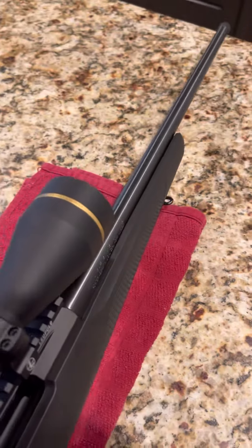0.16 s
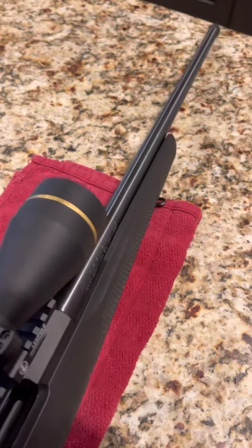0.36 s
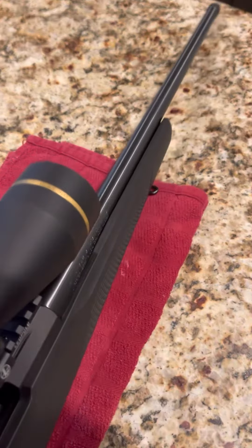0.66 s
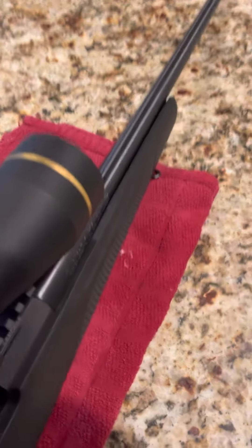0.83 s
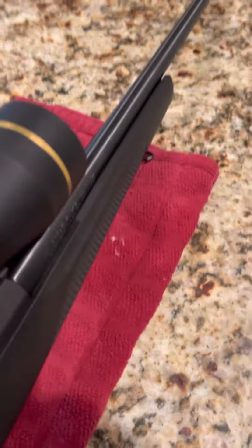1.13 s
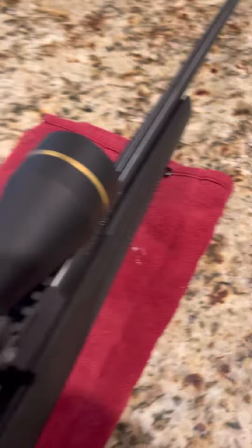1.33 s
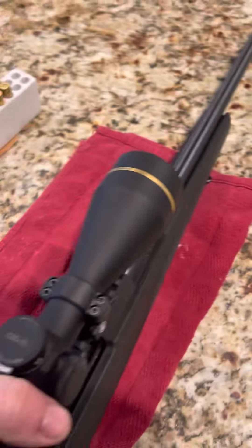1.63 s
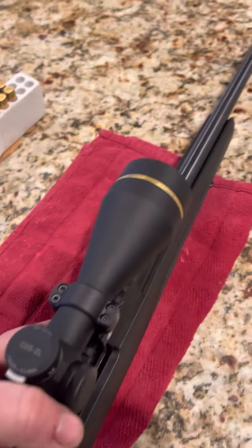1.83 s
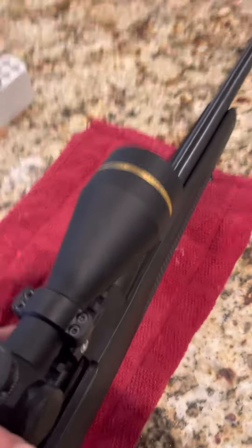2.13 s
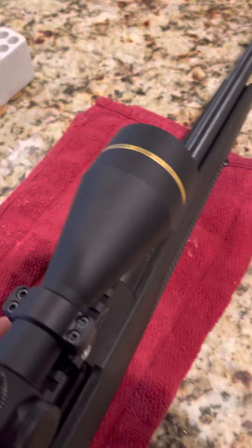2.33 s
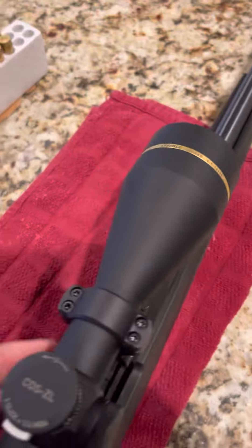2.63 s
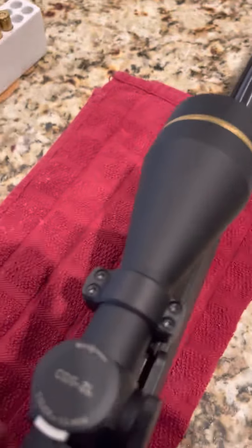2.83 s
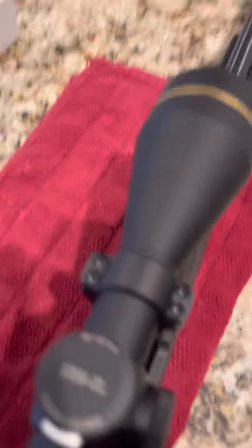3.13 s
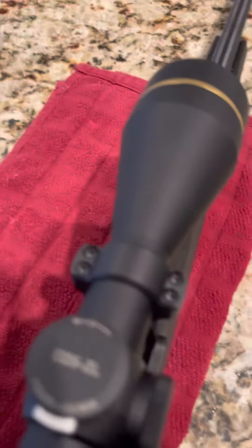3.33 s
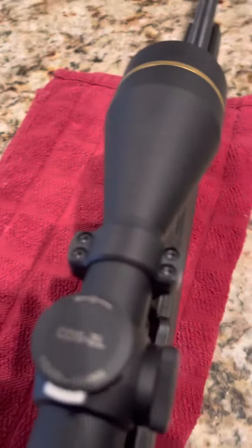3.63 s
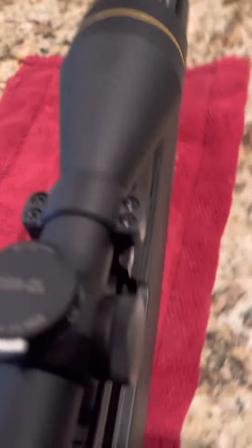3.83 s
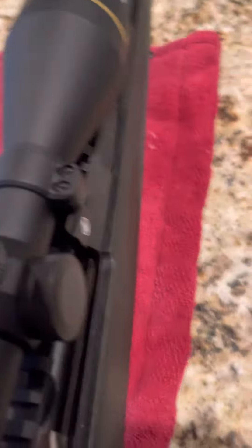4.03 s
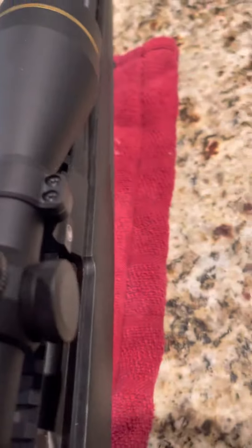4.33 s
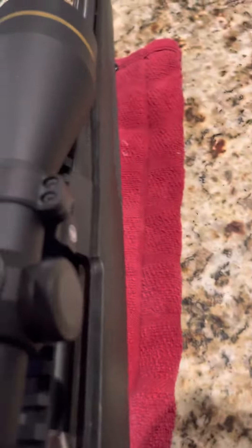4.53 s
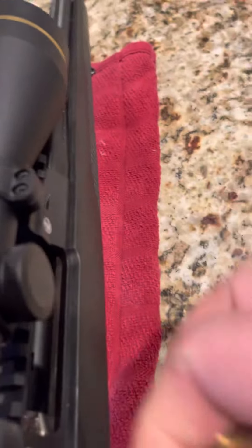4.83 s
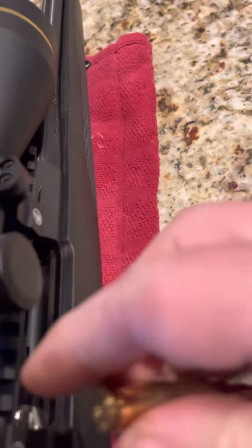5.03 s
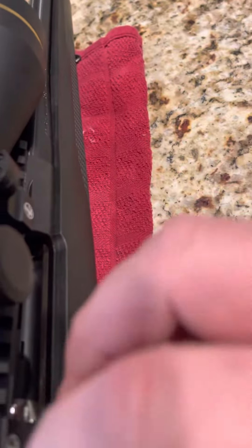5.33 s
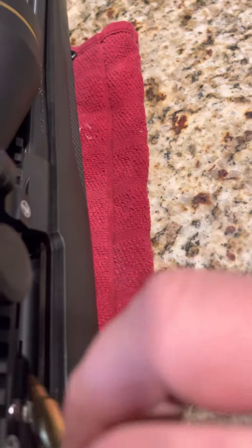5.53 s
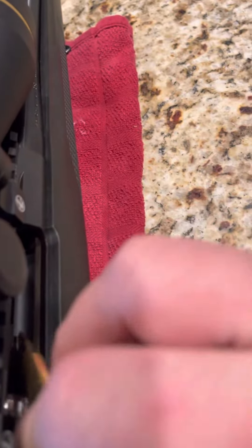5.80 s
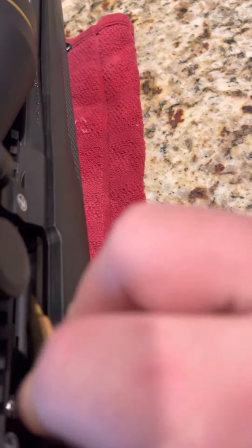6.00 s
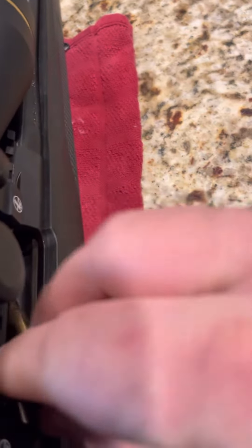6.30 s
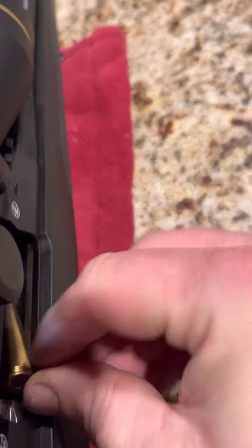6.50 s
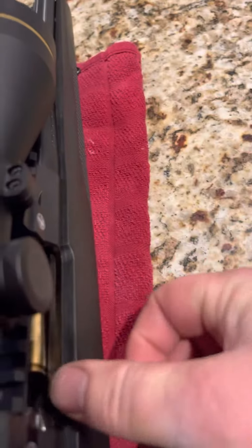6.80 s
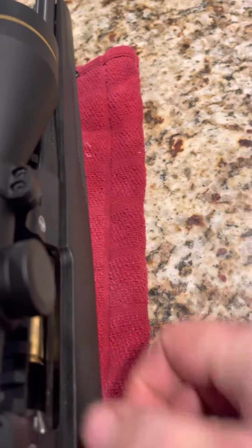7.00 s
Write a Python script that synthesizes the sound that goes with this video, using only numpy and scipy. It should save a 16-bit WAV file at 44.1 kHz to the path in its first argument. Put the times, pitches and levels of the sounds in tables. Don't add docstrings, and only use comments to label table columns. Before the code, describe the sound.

Close phone pickup in a small hard kitchen, fridge humming faintly. First a dull woody knock with quick fading bounces, then several seconds of faint cloth rustle and a couple of light taps as the rifle settles. Near the end, crisp brass-on-steel ticks grow denser, a gritty slide follows, and the round clacks home with short metallic rattles before dying to near silence.

```python
import sys
import numpy as np
from scipy import signal
from scipy.fft import rfft, irfft, next_fast_len
from scipy.io import wavfile
from scipy.ndimage import uniform_filter1d

SR = 44100
rng = np.random.default_rng(int(sys.argv[2]) if len(sys.argv) > 2 else 0)


def pcm_store(signal):
    levels = np.round(np.clip(np.atleast_2d(signal), -1, 1) * 32767)
    wavfile.write(sys.argv[1], SR, levels.astype(np.int16).T)


def decibels_to_gain(level_db):
    exponent = np.asarray(level_db, float) / 20
    return 10 ** exponent


N = 315622


def rms_one(x):
    return x / np.sqrt(np.mean(x ** 2) + 1e-20)


def filtered(x, order, hz, kind="low"):
    return signal.sosfilt(signal.butter(order, hz, kind, fs=SR, output="sos"), x)


def at_hz(points, hz):
    points_hz, value = np.transpose(points)
    return np.interp(np.log(hz + 1), np.log(points_hz), value)


def drift(rate_hz):
    hop, settle = 40, 2000
    r = np.exp(-2 * np.pi * rate_hz * hop / SR)
    noise = rng.standard_normal(N // hop + settle + 2)
    slow = signal.lfilter([1], [1, -2 * r, r * r], noise)[settle:]
    return np.interp(np.arange(N) / hop, np.arange(len(slow)), rms_one(slow))


def coloured(spectrum):
    size = next_fast_len(N)
    hz = np.fft.rfftfreq(size, 1 / SR)
    gain = decibels_to_gain(at_hz(spectrum, hz)) * (hz > spectrum[0][0] / 2)
    white = rng.standard_normal((2, N))
    return rms_one(irfft(rfft(white, size) * gain, size)[:, :N])


def ring(force, hz, t60):
    r, w = decibels_to_gain(-60 / (t60 * SR)), 2 * np.pi * hz / SR
    return signal.lfilter([0, np.sin(w)], [1, -2 * r * np.cos(w), r * r], force)


def body(force, modes, extra_db):
    sound = sum(decibels_to_gain(db + extra) * ring(force, hz, t60) for (hz, db, t60), extra in zip(modes, extra_db))
    return filtered(sound, 3, [modes[0][0], 1.168 * modes[-1][0]], "band")


def favour(modes, favoured_hz):
    spread, boost_db = 0.1, 8
    mode_hz = np.array(modes)[:, 0]
    return boost_db * np.exp(-(np.log(mode_hz / favoured_hz) / spread) ** 2)


def strikes(events, parts, heavy_db, heavy_loss, contact_s, rise_s, trim_db, crack_db, after_db, after_s):
    out, span = np.zeros(N + SR), SR // 8
    age = np.arange(span) / SR
    for start_s, level_db, hard_db, pitch_hz in events:
        noise, at = rng.standard_normal(span), round(start_s * SR)
        part_db = heavy_db - heavy_loss * hard_db, 0, hard_db
        for modes, rel_db, length, rise, first_db in zip(parts, part_db, contact_s, rise_s, crack_db):
            hit = decibels_to_gain(-60 * np.clip(age - rise, 0, 1) / length)
            after = decibels_to_gain(after_db - 60 * age / after_s)
            chatter = noise * (hit + after) * np.clip(age / rise, 0, 1) + 1e-18
            chatter[0] = decibels_to_gain(first_db)
            scatter_db = rng.normal(0, 2.5, len(modes))
            sound = body(chatter, modes, scatter_db + favour(modes, pitch_hz))
            out[at:at + span] += decibels_to_gain(level_db + rel_db + trim_db) * sound / np.abs(sound).max()
    return out[:N]


def stroked(start_s, length_s, level_db):
    t = np.arange(0, N + 32, 32) / SR
    start, length = start_s[:, None], length_s[:, None]
    early = np.clip(start - t, 0, 9) / (0.0085 + 0.21 * length)
    late = np.clip(t - start - length, 0, 9) / (0.019 + 0.66 * length)
    return np.interp(np.arange(N) / SR, t, decibels_to_gain(level_db) @ decibels_to_gain(-20 * (early + late)))


def scrape(strokes, modes, grains_per_s, trim_db):
    sizes = decibels_to_gain(4.0 * np.minimum(rng.exponential(1, N), 4)) * rng.choice([-1, 1], N)
    grains = sizes * (rng.random(N) < grains_per_s / SR)
    sound = rms_one(body(grains, modes, np.zeros(len(modes))))
    return decibels_to_gain(trim_db) * stroked(*np.transpose(strokes)) * sound


def narrow_tones(rows, width_share):
    span, settle = SR // 2, SR // 10
    out, age = np.zeros(N + SR), np.arange(span) / SR
    for start_s, pitch_hz, level_db, rub_s, t60_s in rows:
        decay = 1.8 / (35 + width_share * pitch_hz)
        noise = rng.standard_normal(span + settle)
        tone = ring(ring(noise, pitch_hz, decay), pitch_hz, decay)[settle:]
        power = uniform_filter1d(tone ** 2, size=SR // 40)
        tone = tone / np.sqrt(power + .7 * np.mean(tone ** 2))
        envelope = np.clip(age * 400, 0, 1) * decibels_to_gain(level_db - 60 * np.clip(age - rub_s, 0, 2) / t60_s)
        at = round(start_s * SR)
        out[at:at + span] += tone * envelope
    return out[:N]


# pitch_hz [Hz], level_db [dB rms]
HUM = [
    (120, -57.5),
    (113.1, -61),
    (11000, -103),
]
SHAFT = {1: -67.5, 2: -61.5, 3: -72.5, 4: -75.5, 5: -74.5}


def fridge():
    shaft_hz, wobble_db = 54.6, 2.5
    t, out = np.arange(N) / SR, 0
    for pitch_hz, level_db in HUM + [(order * shaft_hz, db) for order, db in SHAFT.items()]:
        gain = np.sqrt(2) * decibels_to_gain(level_db + wobble_db * np.tanh(drift(1.0)))
        out = out + gain * np.sin(2 * np.pi * (pitch_hz * t + rng.random()))
    return out


# pitch_hz [Hz], level_db [dB per Hz]
AIR = [(15, -48), (25, -27.5), (64, -8), (96, -7), (119, -13), (140, -8.5), (168, -8.5), (271, -14),
       (318, -17.5), (397, -12.5), (1270, -37), (1710, -49.5), (3000, -67), (3900, -58.5), (6600, -120)]
# pitch_hz [Hz], level_db [dB per Hz]
BRIGHT = [(2500, -13.5), (4500, -2.5), (6500, 1), (8500, 5.5), (10500, 8), (11500, -0.5), (12700, -20.5),
          (15500, -34.5)]


def room_air():
    return decibels_to_gain(-60) * coloured(AIR) + decibels_to_gain(-85) * coloured(BRIGHT)


# start_s [s], pitch_hz [Hz], level_db [dB], rub_s [s], t60_s [s]
RUBS = [(.1, 1700, -74.5, 0.21, .3), (3.65, 2000, -81, 0.43, .3), (6.243, 3280, -34, 0.0043, 0.037),
        (.09, 3240, -84.5, 0.37, .3), (1.96, 3170, -66, 0.072, .3), (2.02, 3300, -59, 0.039, 0.33),
        (2.13, 3200, -65.5, 0.19, 0.34), (2.01, 1900, -73, 0.17, .3), (2.193, 2200, -41.5, 0.0025, 0.017),
        (3.129, 330, -55.5, 0.038, 0.18), (3.25, 330, -53, 0.038, 0.33), (4.28, 533, -51.5, 0.0085, 0.039),
        (4.81, 836, -66.5, 0.039, 0.06), (5.588, 900, -50, 0.017, 0.027), (6.167, 780, -36, 0.004, 0.071),
        (6.168, 1500, -46, .003, 0.022), (6.168, 2600, -36, .003, .02), (2.85, 2200, -74, 0.16, 0.22),
        (6.271, 343, -45.5, 0.024, 0.068), (6.274, 141, -46.5, 0.016, 0.51),
        (7.081, 120, -41.5, 0.011, 0.084)]


def rubs():
    return narrow_tones(RUBS, 0.1)


def patchy(x, split_hz, patch_db):
    low = filtered(x, 2, split_hz)
    high = filtered(x, 2, split_hz, "high")
    return low * decibels_to_gain(patch_db * drift(14)) - high * decibels_to_gain(patch_db * drift(14))


# start_s [s], length_s [s], level_db [dB], brightness_db [dB]
SLEEVES = [(0.108, 0.28, -71, -50), (0.508, 0.021, -62, -46), (0.547, 0.42, -69, -28),
           (1.233, 0.013, -74, -30), (1.364, 0.17, -70.5, -10.5), (1.63, 0.21, -67, -21),
           (1.747, 0.019, -55.5, -3), (1.798, 0.07, -62, -5.5), (1.917, 0.037, -67, -2.5),
           (2.008, 0.25, -56.5, -26), (2.191, 0.0075, -62.5, 3), (2.274, 0.076, -56.5, -4),
           (2.388, 0.072, -60, -4.5), (2.485, 0.089, -62, -8.5), (2.606, 0.063, -68, 9),
           (2.704, 0.085, -70, -4.5), (2.857, 0.057, -61.5, -11), (2.925, 0.055, -65, -0.5),
           (3.027, 0.1, -68.5, -5), (3.164, 0.16, -69, -24), (3.351, 0.03, -85, 9),
           (3.517, 0.059, -65.5, -10), (3.618, 0.16, -61, -9), (3.809, 0.09, -62.5, -9.5),
           (3.911, 0.074, -65, -15), (4.014, 0.042, -63.5, -29), (4.122, 0.071, -73.5, -12),
           (4.266, 0.012, -63, -8), (4.562, 0.037, -96, 22), (4.721, 0.042, -65.5, 3.5),
           (4.874, 0.055, -74.5, -4.5), (4.983, 0.11, -65.5, -3.5), (5.172, 0.031, -75, -8),
           (5.24, 0.22, -72.5, -5.5)]
# start_s [s], length_s [s], level_db [dB], brightness_db [dB]
FINGERS = [(5.526, 0.062, -51.5, -22), (5.65, 0.11, -65, -34), (5.774, 0.094, -57.5, -7.5),
           (5.888, 0.12, -63.5, -17), (6.05, 0.11, -57, -4.5), (6.124, 0.17, -45, -28),
           (6.256, 0.12, -57, 0.5), (6.447, 0.031, -46, -17), (6.572, 0.052, -51.5, -13),
           (6.676, 0.01, -42.5, -35), (6.729, .1, -47.5, -35), (6.805, 0.019, -57.5, -5.5),
           (6.866, 0.04, -75.5, -6.5), (7.001, 0.13, -80, -14)]
# pitch_hz [Hz], level_db [dB per Hz]
DULL = [(500, 7.5), (900, 4.5), (1500, 1), (2500, 1.5), (4000, -5), (6000, -13.5)]


def rustle():
    start_s, length_s, level_db, bright_db = np.transpose(SLEEVES + FINGERS)
    flutter = drift(40)
    dull_gain = decibels_to_gain(-80) + stroked(start_s, length_s, level_db)
    dull_gain = dull_gain * decibels_to_gain(-7.0 + 0.34 * flutter + 0.26 * drift(23))
    bright_gain = decibels_to_gain(-102) + stroked(start_s, length_s, level_db + bright_db)
    bright_gain = bright_gain * decibels_to_gain(4.5 + 0.66 * flutter + 0.97 * drift(120))
    dull = dull_gain * patchy(coloured(DULL), 3000, patch_db=4.0)
    return dull + bright_gain * patchy(coloured(BRIGHT), 14000, patch_db=4.7)


# start_s [s], level_db [dB], hardness_db [dB], pitch_hz [Hz]
KNOCKS = [(0.514, -21.5, -18, 1680), (0.578, -31, -23, 1670), (0.624, -35.5, -40, 1380),
          (0.651, -37, -38, 1650), (0.678, -33.5, -33, 1420), (0.768, -47.5, -40, 1640),
          (0.828, -52, -33, 1670), (0.889, -68, -38, 1670), (0.953, -52.5, -49, 1670),
          (1.097, -59, -12, 1670), (0.686, -34, -21, 1350)]
# pitch_hz [Hz], level_db [dB], t60_s [s]
THUD = [(120, -7, 0.18), (203, -11, 0.15), (219, -6.5, 0.081), (275, -18.5, 0.23), (321, -11, 0.22),
        (368, -8.5, 0.065), (499.5, -3, 0.1), (580, 6.5, 0.044)]
STOCK = [(700, 2.5, 0.04), (883, 4.5, 0.023), (1003, -8, 0.036), (1150, -4, 0.061), (1190, -11, 0.051),
         (1330, -12, 0.024), (1400, 2, 0.048), (1670, 8, 0.013), (1790, -25, 0.0312), (2200, -24, 0.0337)]
STUD = [(2500, 20, 0.00092), (3820, -7, 0.0097), (5860, -72, 0.0025), (8200, -16, 0.001),
        (10630, -53, 0.0036)]


def knocks():
    return strikes(KNOCKS, [THUD, STOCK, STUD], heavy_db=-17, heavy_loss=0.46,
                   contact_s=[.05, .018, .01], rise_s=[.012, .0007, .0004],
                   trim_db=0.0, crack_db=[-9, 9, 8], after_db=-2.5, after_s=0.06)


# start_s [s], level_db [dB]
EDGES = [(.514, -64), (4.72, -60), (5.0, -62), (5.248, -48), (5.51, -38), (5.748, -29.5), (5.7585, -33),
         (6.018, -20.5), (6.029, -40), (6.1, -40), (6.128, -29.5), (6.243, -17.5), (6.273, -14.5),
         (6.289, -36.5), (6.468, -45.5), (6.487, -48), (6.506, -32), (6.516, -23.5), (6.553, -25.5),
         (6.6615, -40), (6.685, -36.5)]


def edges():
    out, age = np.zeros(N), np.arange(SR // 50) / SR
    for start_s, level_db in EDGES:
        burst = decibels_to_gain(level_db - 60 * age / 0.0045) * rng.standard_normal(len(age))
        out[round(start_s * SR):][:len(age)] += burst
    return filtered(out, 4, 12000, "high")


# start_s [s], length_s [s], level_db [dB]
DRAG = [
    (0.74, 0.25, -63.5),
    (1.068, 0.025, -63.5),
]


def drag():
    return scrape(DRAG, THUD[4:] + STOCK, 2100, trim_db=-1.0)


# start_s [s], pitch_hz [Hz], level_db [dB], rub_s [s], t60_s [s]
RINGS = [
    (.96, 1390, -61, 0.016, 0.054),
    (0.97, 580, -56, 0.033, 0.1),
    (1.057, 1390, -50.5, 0.011, 0.12),
    (1.11, 590, -64, 0.065, 0.11),
    (5.761, 3650, -52.5, .01, 1.0),
    (6.03, 1680, -51, 0.08, .06),
    (6.8, 750, -43.5, 0.018, 0.39),
]


def rings():
    return narrow_tones(RINGS, 0.045)


# start_s [s], level_db [dB], hardness_db [dB], pitch_hz [Hz]
SHIFTS = [
    (1.239, -57, -28, 1500),
    (1.576, -57.5, -5, 1650),
    (1.748, -55, -2, 2200),
    (2.193, -55, 1, 2200),
    (3.122, -37.5, -6.5, 2200),
    (3.225, -42.5, -11, 1163),
    (3.232, -48.5, -14, 860),
    (3.241, -38.5, -12.5, 1163),
    (4.284, -69, -1, 875),
    (7.081, -60.5, -43, 795),
]
# pitch_hz [Hz], level_db [dB], t60_s [s]
FOREND = [(634, -25.5, 0.018), (860, 3, 0.039), (1163, -4, 0.041), (1600, 19, 0.0026), (2020, 4, 0.0078),
          (2220, 1, 0.0073), (2900, -3, 0.0056)]
SWIVEL = [(2600, 23, 0.0023), (3750, 21, 0.0042), (5840, -49, 0.00078), (6300, -26, 0.0022)]


def shifts():
    return strikes(SHIFTS, [THUD, FOREND, SWIVEL], heavy_db=-17, heavy_loss=0.46,
                   contact_s=[.07, .018, .01], rise_s=[.008, .0007, .0004],
                   trim_db=2.5, crack_db=[-9, 9, 8], after_db=-13.5, after_s=0.078)


# start_s [s], level_db [dB], hardness_db [dB], pitch_hz [Hz]
TICKS = [(5.248, -63, 15.5, 1320), (5.51, -40.5, 10, 2750), (5.525, -67, 21, 950),
         (5.564, -61.5, 17.5, 700), (5.595, -65.5, 13, 883), (5.645, -54.5, 3.5, 2370),
         (5.748, -26.5, 14.5, 3640), (5.7585, -29.5, 20, 3600), (5.7635, -30.5, 16, 3350),
         (6.018, -39, 16.5, 1660), (6.029, -43, 10, 1690), (6.1, -44, 19, 1723), (6.128, -29.5, 16.5, 1650),
         (6.1385, -36.5, 16.5, 2610), (6.168, -38.5, -7.5, 2200), (6.243, -24, 11.5, 3380),
         (6.273, -23, 14, 3850), (6.289, -30.5, 9, 635)]
# pitch_hz [Hz], level_db [dB], t60_s [s]
BOX = [(746, -7.5, 0.03), (750, -6.5, 0.0034), (900, -2.5, 0.025), (1140, 11.5, 0.012), (1420, 8, 0.02),
       (1500, -11.5, .05), (1634, 6.5, 0.04), (1880, -11, 0.15)]
CHAMBER = [(2190, 4, 0.022), (2706, 8, 0.015), (3206, 4.5, 0.017), (3435, 9, 0.02), (3770, 5, 0.01424),
           (4460, -3.5, 0.0037)]
BRASS = [(5100, 4, 0.0031), (7130, -37, 0.0065), (6940, -31.5, 0.0046), (8600, -10, 0.011),
         (8400, -12.5, 0.0077), (10300, 25, 0.0026), (10450, -24, .15), (9600, 5, 0.0025),
         (10070, -23, 0.0027)]


def ticks():
    return strikes(TICKS, [BOX, CHAMBER, BRASS], heavy_db=-1.5, heavy_loss=0.69,
                   contact_s=[.018, .009, .006], rise_s=[.0007, .0004, .0002],
                   trim_db=9.0, crack_db=[4, 8, 11], after_db=-30.0, after_s=0.0064)


# start_s [s], length_s [s], level_db [dB]
SLIDE = [
    (5.53, 0.066, -42),
    (6.16, 0.15, -37.5),
    (6.3, .18, -48),
    (6.61, .09, -37),
    (6.8, 0.11, -73),
]
# pitch_hz [Hz], level_db [dB], t60_s [s]
RECEIVER = [(2135, -4.5, 0.03), (2363, -11.5, 0.11), (2465, -10, .02), (2770, -4, 0.018),
            (2970, -9.5, 0.024), (3210, -12.5, 0.015), (3530, -15, 0.014), (3640, -8, 0.0099),
            (4040, -11, 0.016), (4340, -22, 0.02)]


def slide():
    return scrape(SLIDE, BOX + RECEIVER, 1400, trim_db=-19.0)


# start_s [s], level_db [dB], hardness_db [dB], pitch_hz [Hz]
SNAPS = [(6.334, -45.5, 0.5, 1410), (6.434, -46.5, -0.5, 990), (6.468, -31.5, -3.5, 990),
         (6.476, -44, -15, 2140), (6.488, -27, -6.5, 1373), (6.498, -36.5, -16, 1410),
         (6.506, -19, 0.5, 2900), (6.516, -13.5, 2, 1424), (6.536, -51, 8.5, 1450), (6.553, -14, 4.5, 1380),
         (6.562, -45, -3.5, 1700), (6.601, -34, -6.5, 2770), (6.6618, -23.5, 0.5, 2360),
         (6.6858, -29.5, 1, 2190), (6.704, -58, -2, 1383), (6.721, -30, -5.5, 746),
         (6.741, -34.5, -1, 2210), (6.754, -43.5, -4, 1630), (6.792, -31.5, -9, 746),
         (6.808, -37.5, -10, 2900), (6.837, -48, -12.5, 1600), (6.869, -49, 3, 1450)]
# pitch_hz [Hz], level_db [dB], t60_s [s]
MAGAZINE = [(667, -13, 0.051), (755, -3, 0.035), (851, -5.5, .03), (990, -7.5, .025), (1130, -7.5, .03),
            (1300, -11.5, 0.034), (1398, 0.5, 0.043), (1448, -1, 0.04), (1614, -8, 0.082),
            (1867, -2.5, 0.058), (1900, -15, 0.076)]
LIPS = [(4900, -25.5, 0.0049), (6000, 3, 0.0038), (6470, 7, 0.0026), (6940, 3.5, 0.003), (7900, -1.5, .004),
        (8200, -7.5, 0.014), (10500, 2, 0.004), (10450, -2, .004), (11400, -11, 0.003)]


def snaps():
    return strikes(SNAPS, [MAGAZINE, RECEIVER, LIPS], heavy_db=0.14, heavy_loss=0.35,
                   contact_s=[.02, .014, .008], rise_s=[.001, .0007, .0003],
                   trim_db=6.5, crack_db=[17, 19, 19], after_db=-12.5, after_s=0.035)


# start_s [s], length_s [s], level_db [dB], pitch_hz [Hz]
RATTLE = [(6.477, 0.0087, -42, 2360), (6.484, 0.012, -36, 1410), (6.496, 0.0043, -31.5, 1410),
          (6.506, 0.0052, -31, 1410), (6.519, 0.006, -23, 1450), (6.557, 0.007, -23, 1410),
          (6.565, .004, -32.5, 2170), (6.6, 0.005, -32, 2770), (6.668, 0.014, -42, 1410),
          (6.682, 0.017, -36, 2190), (6.698, 0.012, -37, 1600), (6.727, 0.017, -34, 1444),
          (6.738, 0.0093, -32.5, 2170), (6.749, 0.0085, -31.5, 1650), (6.793, 0.033, -35.5, 1437),
          (6.797, 0.02, -35, 2750), (6.828, 0.0096, -42.5, 1410), (6.832, 0.018, -41.5, 1663),
          (6.864, 0.01, -50.5, 1450)]
# pitch_hz [Hz], level_db [dB], t60_s [s]
FOLLOWER = [(730, -5.5, .04), (1170, -6.5, .03), (1410, -11, .05), (1450, -1, 0.04), (1690, -4.5, 0.072),
            (2080, -3.5, 0.034), (2170, -4, 0.062), (2400, -10, 0.042), (2630, -6, 0.032),
            (2900, -9, 0.028), (3040, -14.5, .03), (3600, -22, 0.028), (4310, -10.5, .03)]


def rattle():
    grains_per_s, uneven_db, grip_s = 2000, 1.5, 0.0054
    out, span = np.zeros(N + SR), SR // 10
    age = np.arange(span) / SR
    for start_s, length_s, level_db, pitch_hz in RATTLE:
        chance, size, sign = rng.random((3, span))
        sizes = decibels_to_gain(uneven_db * -np.log(size + .02)) * np.sign(sign - .5)
        grains = (chance < grains_per_s / SR) * sizes * (age < length_s) + 1e-18
        grip = decibels_to_gain(-20 * np.clip(age - length_s, 0, 1) / grip_s)
        sound = body(grains, FOLLOWER, favour(FOLLOWER, pitch_hz)) * grip
        at = round(start_s * SR)
        out[at:at + span] += decibels_to_gain(level_db) * sound / np.sqrt(np.mean(sound[age < length_s] ** 2))
    return out[:N]


# pitch_hz [Hz], t60_s [s]
ROOM = [(150, 1), (700, 1), (2000, 0.57), (5000, 0.49), (11000, 0.074)]


def kitchen(x):
    span, tail = int(.6 * SR), 0
    age = np.arange(span) / SR
    for low_hz in 100 * 2. ** np.arange(7):
        band = filtered(rng.standard_normal((2, span)), 2, [low_hz, 2 * low_hz], "band")
        tail = tail + band * decibels_to_gain(-60 * age / at_hz(ROOM, 2.03 * low_hz))
    tail = filtered(tail, 12, 11300) * np.clip(age / 0.0023, 0, 1)
    tail = tail / np.sqrt(np.sum(tail[0] ** 2))
    return decibels_to_gain(-19.5) * signal.fftconvolve(x[None], tail, axes=1)[:, :N]


# pitch_hz [Hz], lead_rad [radians left leads]
LEAD = [(2000, 0.1), (2900, 0.93), (4400, 1.28), (5650, 6.16), (6300, 6.9), (8550, 9.02), (12700, 12.49),
        (14500, 16)]
# pitch_hz [Hz], share [0-1]
ALIKE = [(280, 0.95), (560, 0.17), (1800, 0.91), (2400, 0.25), (5250, 0.75), (5650, 1), (12050, 0.93),
         (14200, .8)]
# [left over right, dB]
SHADOW = [(1500, 0), (2700, -1), (3500, -2.5), (4500, 0), (5500, 1.5), (7000, 0), (12000, 0), (14000, 1.5)]


def ports(direct, diffuse):
    size = next_fast_len(N + 4096)
    hz = np.fft.rfftfreq(size, 1 / SR)
    alike = np.clip(np.interp(hz, *np.transpose(ALIKE)), 0, 1)
    common, apart = rfft(diffuse, size)
    side = np.array([[1], [-1]])
    both = rfft(direct, size) * decibels_to_gain(.5 * side * at_hz(SHADOW, hz))
    both = both + np.sqrt((1 + alike) / 2) * common + side * np.sqrt((1 - alike) / 2) * apart
    turn = np.exp(.5j * side * np.interp(hz, *np.transpose(LEAD)))
    return irfft(both * turn, size)[:, :N]


def scene():
    near = knocks() + drag() + shifts() + ticks() + slide() + snaps() + rattle()
    near = filtered(near, 10, 11900)
    direct = near + edges() + rubs() + rings() + fridge()
    diffuse = kitchen(near) + rustle() + room_air()
    return ports(direct, diffuse)


def band_limit(x):
    return signal.sosfilt(signal.butter(12, 16300, fs=SR, output="sos"), x)


def record(dry):
    dull = filtered(dry, 6, 12000)
    mix = 1.355 * np.tanh(dull / 1.502)
    return band_limit(mix)


dry = scene()
out = record(dry)
pcm_store(out)
```